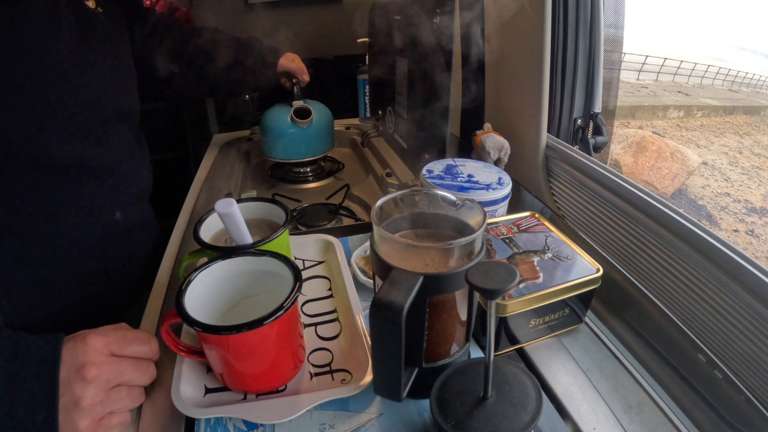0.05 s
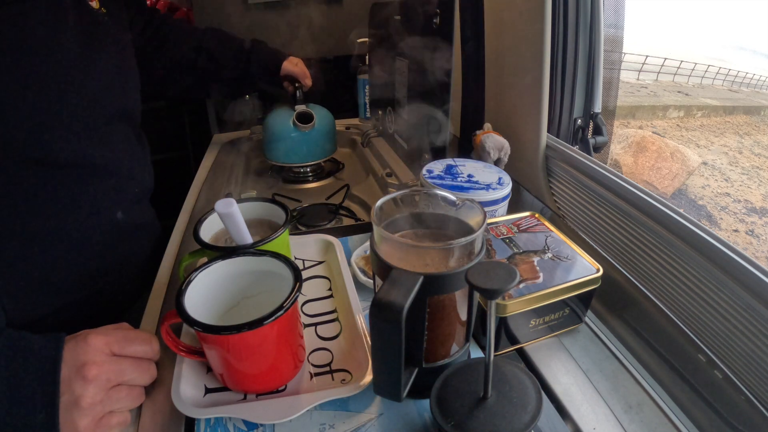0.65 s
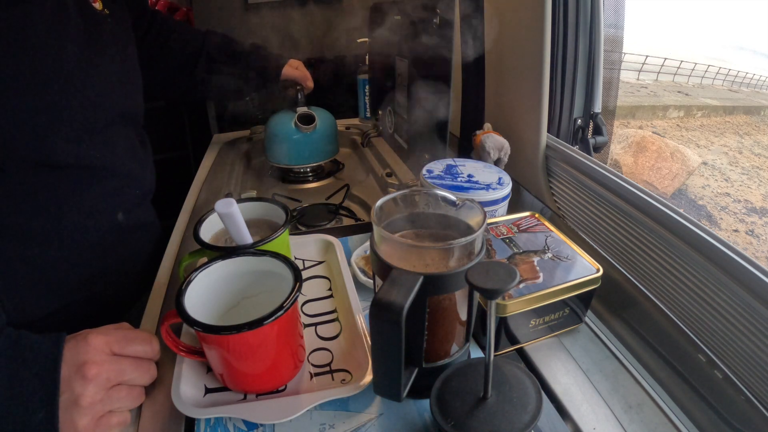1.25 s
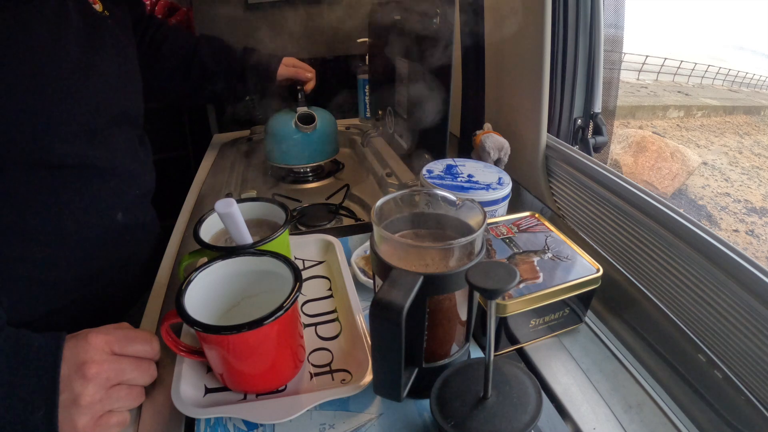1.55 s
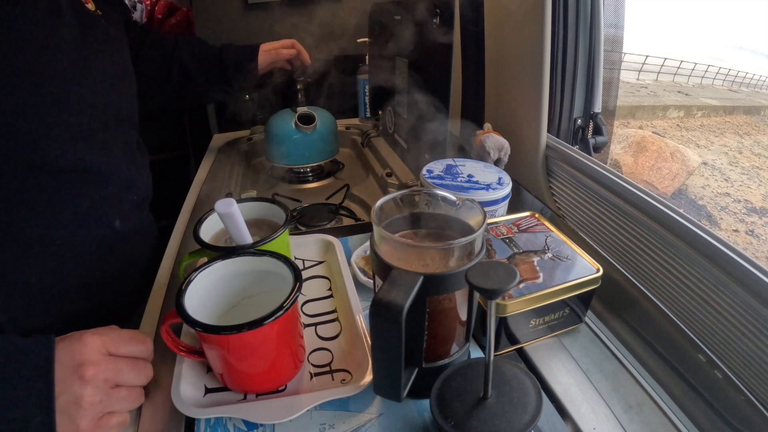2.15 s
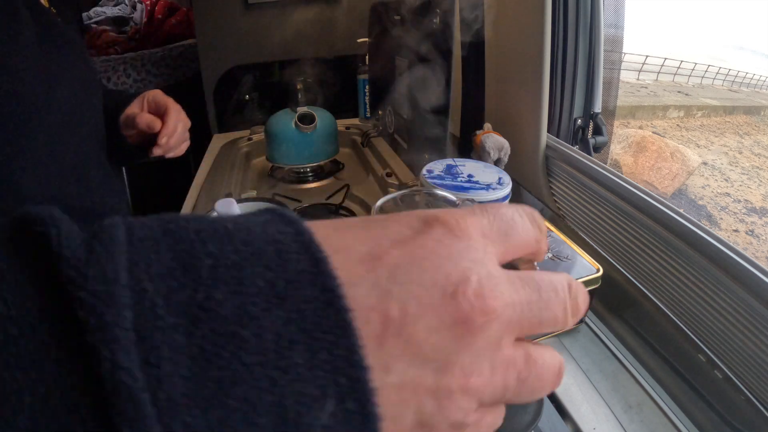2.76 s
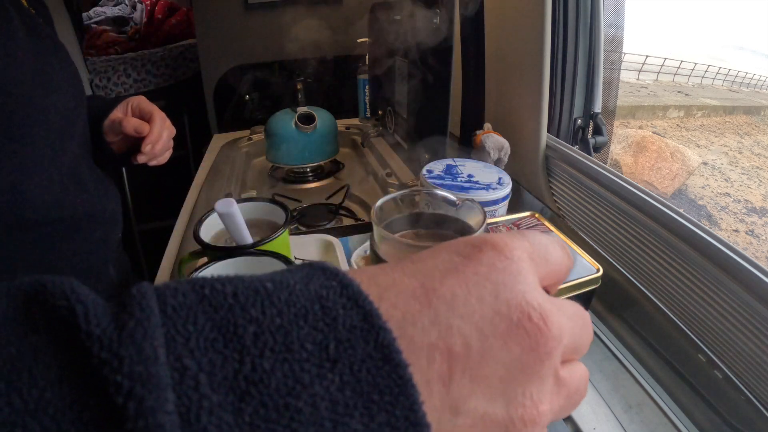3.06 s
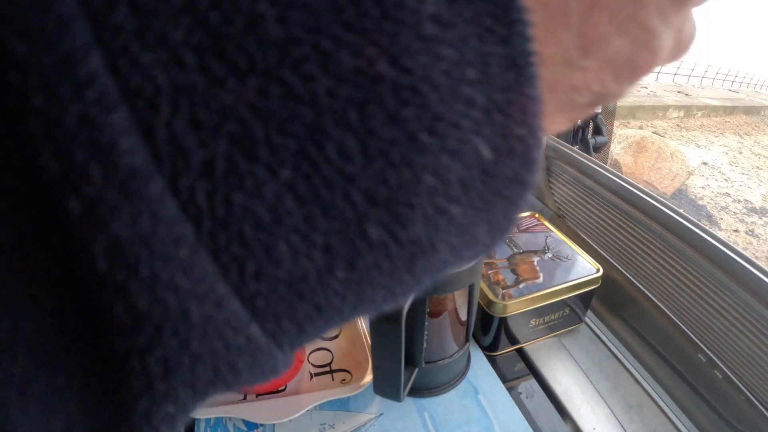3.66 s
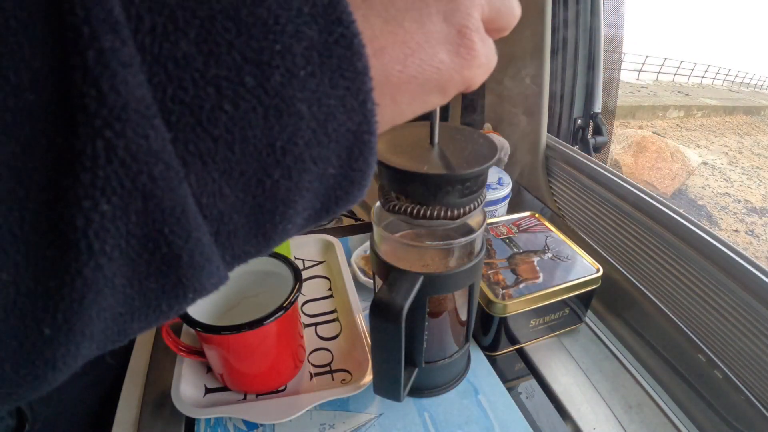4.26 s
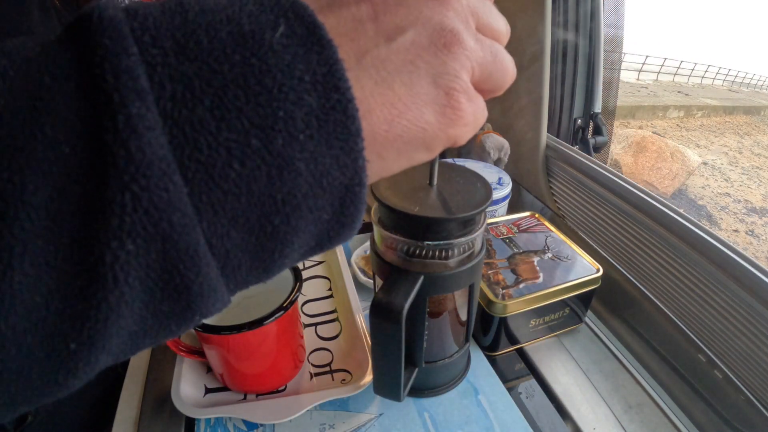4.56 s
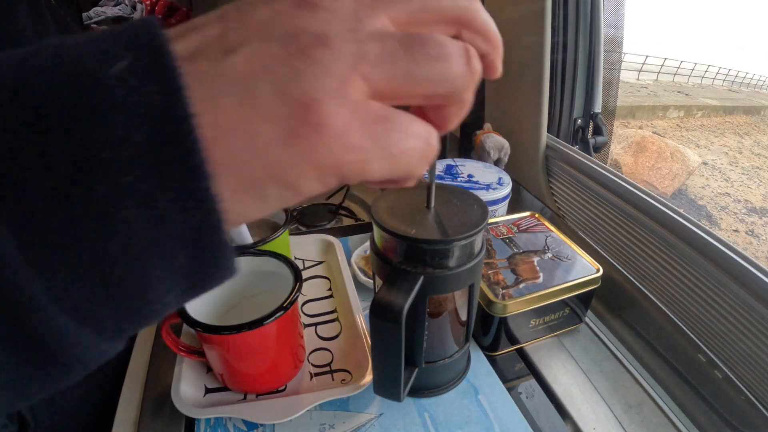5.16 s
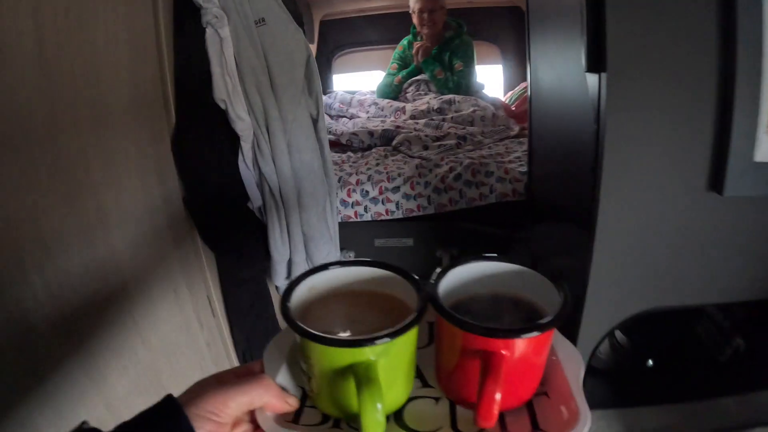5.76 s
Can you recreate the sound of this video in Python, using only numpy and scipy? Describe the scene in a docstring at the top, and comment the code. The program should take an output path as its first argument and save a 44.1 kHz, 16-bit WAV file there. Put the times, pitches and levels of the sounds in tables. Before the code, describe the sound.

In a cramped van kitchen with almost no echo, a kettle clatters and wobbles on the steel bars of a stove over the soft, constant rumble of a gas flame. Two dull knocks follow as a plunger is picked up, with faint, close swishes of a sleeve. Its filter taps a glass coffee press a few times and the lid clacks into place. The rumble then stops abruptly, giving way to near silence and a tiny rustle.

```python
"""A low, steady roar, likely a gas burner, fills a small van. A kettle is set on the hob and rocks on the
pan support, each impact exciting the modes of kettle, steel bars, hob and counter. A fleece sleeve
brushes close by with a hiss of friction; the plunger lid taps a glass coffee press and clicks home.
Near the end the roar stops abruptly, leaving a quieter cabin and a soft rustle."""
import sys
import numpy as np
from scipy import signal
from scipy.fft import rfft, irfft
from scipy.io import wavfile
from scipy.ndimage import uniform_filter1d

SR = 44100
rng = np.random.default_rng(int(sys.argv[2]) if len(sys.argv) > 2 else 0)


def digitize_waveform(pressure):
    """Quantize a signal to 16-bit integers and store it at the path in sys.argv[1].

    Rows of a 2-D input are taken as channels; values are limited to [-1, 1].
    """
    field = np.atleast_2d(pressure).T
    bounded = np.clip(field, -1, 1)
    quanta = np.round(bounded * 32767).astype(np.int16)
    wavfile.write(sys.argv[1], SR, quanta)


N = 260631


def gain_of(db):
    """Amplitude ratio: tenfold for every 20 dB."""
    return 10 ** (np.asarray(db) / 20)


def curve_at(points, hz):
    """Interpolation on a logarithmic frequency axis."""
    f, value = np.transpose(points)
    return np.interp(np.log(hz + 1), np.log(f + 1), value)


# Stereo width. Each row: frequency in Hz, side level over mid in dB.
STEREO_WIDTH = [(30, -20), (120, -17), (500, -9.5), (2000, -11), (8000, -15), (12000, -4.5)]

def noise(spectrum, size):
    """Spectral shaping: stereo noise of rms 1, nearly coherent between the ears in the bass."""
    hz = np.fft.rfftfreq(size, 1 / SR)
    roll_off = np.maximum(hz / spectrum[-1][0], 1) ** -4
    white = rfft(rng.standard_normal((2, size)))
    mid, side = white * gain_of(curve_at(spectrum, hz)) * roll_off * (hz > 10)
    side = side * gain_of(curve_at(STEREO_WIDTH, hz))
    x = irfft(np.array([mid + side, mid - side]), size)
    return x / x.std()


def unit_blow(x):
    """Normalisation of an impact to rms 1 over its first 30 ms."""
    return x / np.sqrt(np.mean(x[:, :round(.03 * SR)] ** 2))


def ring(modes, rise_s, scatter_db, spread, detune=0.0044):
    """Free vibration: a sum of damped modes, weighted and loaded anew by each point of contact."""
    t = np.arange(SR // 2) / SR
    hz, db, t60 = np.transpose(modes)[:, :, None]
    weight, lag, phase, load = rng.standard_normal((4, len(modes), 1))
    envelope = gain_of(db + scatter_db * weight - 60 * t / t60) * (1 - np.exp(-t / rise_s))
    angle = 2 * np.pi * hz * (1 + detune * load) * t + np.pi * phase
    ear_phase = spread * lag * np.sqrt(hz / hz.max())
    return unit_blow(np.array([(envelope * np.sin(angle + ear * ear_phase)).sum(0) for ear in (1, -1)]))


def burst(spectrum, decay, rise_s):
    """Modal overlap: dense modes merge into noise, each band dying at its own rate."""
    size = SR // 2
    t, hz = np.arange(size) / SR, np.fft.rfftfreq(size, 1 / SR)
    excitation = rfft(noise(spectrum, size))
    centres, t60s = np.transpose(decay)
    bands = [irfft(excitation * curve_at(np.c_[centres, share], hz), size) for share in np.eye(len(decay))]
    dying = sum(band * gain_of(-60 * t / t60) for band, t60 in zip(bands, t60s))
    return unit_blow(dying * (1 - np.exp(-t / rise_s)))


def soften(x, corner_hz):
    """A soft contact acts as a low-pass filter."""
    return signal.sosfilt(signal.butter(2, min(corner_hz, .45 * SR), fs=SR, output="sos"), x)


def add(mix, start_s, sound):
    """Superposition of a stereo sound on the mix."""
    part = mix[:, round(start_s * SR):][:, :sound.shape[1]]
    part += sound[:, :part.shape[1]]


def quiet_share(at_s=5.633, fade_s=0.0038):
    """Linear crossfade from 0 to 1 as the roar gives way to the quiet cabin."""
    return np.clip((np.arange(N) / SR - at_s) / fade_s + .5, 0, 1)


# Spectra of the still cabin and a rustle. Each row: frequency in Hz, relative density in dB.
CABIN_SPECTRUM = [(20, 2), (45, -3.5), (100, -15), (200, -19.5), (370, -29.5), (520, -38), (800, -42),
                  (1500, -32.5), (3000, -40), (7000, -44.5), (10000, -58.5), (14000, -66)]
RUSTLE_SPECTRUM = [(200, 0), (800, -8), (1500, -6), (3200, -4), (5000, -18), (9000, -31), (13000, -50)]
# Envelope of the rustle. Each row: time in seconds, level in dB.
RUSTLE_ENVELOPE = [(5.78, -70), (5.86, -68.5), (5.885, -55), (5.91, -59)]

def quiet_cabin():
    """Ambient noise: a bass-heavy floor with one brief broadband rustle."""
    ambience = quiet_share() * gain_of(-52) * noise(CABIN_SPECTRUM, N)
    times, levels = np.transpose(RUSTLE_ENVELOPE)
    rustle_db = np.interp(np.arange(N) / SR, times, levels, left=-np.inf, right=-np.inf)
    return ambience + gain_of(rustle_db) * noise(RUSTLE_SPECTRUM, N)


# Spectra of the rumble, midrange roar and gas jet. Each row: frequency in Hz, relative density in dB.
RUMBLE_SPECTRUM = [(20, 1.5), (35, 3), (50, -1), (90, -2.5), (165, -3.5), (250, -17), (330, -18.5),
                   (480, -37), (900, -54.5)]
ROAR_SPECTRUM = [(250, -12.5), (400, -0.5), (500, -7.5), (620, -0.5), (800, -13), (1040, -0.5), (1350, -7),
                 (1700, -7), (2100, -15.5), (2700, -21), (5000, -50)]
JET_SPECTRUM = [(1500, -14), (2600, -2), (7500, 4.5), (10000, -5), (13000, -14.5)]
# Faint tones in the roar. Each row: centre in Hz, bandwidth in Hz, level in dB.
WHISTLE_BANDS = [(990, 180, -70.5), (4780, 300, -85)]

def burner(waver_s=.11, waver_db=1.5):
    """Broadband noise with a randomly modulated rumble; narrow bands of it are heard as whistles."""
    waver = np.interp(np.arange(N) / SR / waver_s, np.arange(N), rng.standard_normal(N))
    rumble = gain_of(-41 + waver_db * waver) * noise(RUMBLE_SPECTRUM, N)
    roar = rumble + gain_of(-58) * noise(ROAR_SPECTRUM, N) + gain_of(-77) * noise(JET_SPECTRUM, N)
    for hz, width, db in WHISTLE_BANDS:
        band = signal.butter(2, [hz - width / 2, hz + width / 2], "bandpass", fs=SR, output="sos")
        whistle = signal.sosfilt(band, rng.standard_normal(N))
        roar += gain_of(db) * whistle / whistle.std()
    return roar * (1 - quiet_share())


# Spectrum of rubbing fleece. Each row: frequency in Hz, relative density in dB.
FLEECE_SPECTRUM = [(800, -27), (2500, -7), (3800, -6), (5200, -3), (7500, -0.5), (9000, -4.5),
                   (10500, -15.5), (12200, -11.5), (14500, -31)]
# Strokes of the arm. Each row: start in seconds, length in seconds, peak level in dB.
SLEEVE_STROKES = [(2.29, 0.31, -71.5), (2.567, 0.46, -65.5), (3.205, 0.41, -68.5), (3.325, 0.3, -61),
                  (3.56, 0.23, -66), (3.72, 0.21, -71.5), (4.095, .11, -64.5), (4.158, 0.28, -69.5),
                  (4.482, 0.14, -61), (4.684, 0.26, -72.5), (5.058, 0.083, -73), (5.167, 0.92, -67)]

def sleeve(skew=0.69, speed_exponent=0.81):
    """Friction noise: fleece fibres catch and hiss, louder the faster the sleeve slides."""
    t, power = np.arange(N) / SR, np.zeros(N)
    for start, length, db in SLEEVE_STROKES:
        progress = np.clip((t - start) / length, 0, 1)
        speed = abs(np.sin(np.pi * progress ** skew))  # one arch, peaking before its middle
        power += (gain_of(db) * speed ** speed_exponent) ** 2
    catch = uniform_filter1d(rng.standard_normal(N), size=300)
    flicker = gain_of(catch / catch.std())  # about one decibel
    return noise(FLEECE_SPECTRUM, N) * flicker * np.sqrt(power) * (1 - quiet_share())


# Modes of the plastic lid, glass beaker and steel filter disc.
# Each row: frequency in Hz, relative level in dB, T60 in seconds.
LID_MODES = [(663, -5.5, 0.075), (788, -0.5, 0.039), (1317, -4, .06), (1877, 3, 0.024), (2229, -6, 0.066),
             (3294, -4.5, 0.026), (4220, -6.5, 0.043), (5560, -6, 0.023), (7500, -13.5, .03)]
GLASS_MODES = [(1300, 0, 0.049), (3050, -7, 0.027)]
DISC_MODES = [(4440, -0.5, 0.036), (4340, -7.5, 0.066)]
# Spectrum of the lid's crack. Each row: frequency in Hz, relative density in dB.
CRACK_SPECTRUM = [(200, -27), (700, -0.5), (2000, 0), (4300, -3.5), (6000, -5.5), (8200, -8),
                  (10000, -13.5), (13000, -27), (16000, -52)]
# Reverberation of the cabin. Each row: frequency in Hz, T60 in seconds.
CABIN_REVERB = [(200, 0.23), (1000, 0.14), (4000, 0.13), (12000, 0.1)]

def press_responses():
    """Impulse responses to one contact on the press; crack and glass carry a faint reverberant tail."""
    crack = burst(CRACK_SPECTRUM, decay=[(500, 0.061), (3000, 0.023), (10000, 0.019)], rise_s=0.00038)
    tail = burst(CRACK_SPECTRUM, CABIN_REVERB, rise_s=0.02)
    lid, glass, disc = (ring(modes, rise_s=.0002, scatter_db=.5, spread=.15)
                        for modes in (LID_MODES, GLASS_MODES, DISC_MODES))
    thud = burst(spectrum=[(30, -2), (90, -1), (240, 7.5), (450, -11.5), (1200, -50)],
                 decay=[(100, 0.31), (400, 0.13)], rise_s=0.003)
    return crack + gain_of(-18) * tail, lid, glass + gain_of(-12.5) * tail, disc, thud


# The filter meets the beaker. Each row: start in seconds, then ring, crack and counter thud in dB.
FILTER_CLINKS = [(4.366, -65.5, -72, -75), (4.4645, -77, -64.5, -65.5), (4.4965, -41.5, -49, -55),
                 (4.557, -57, -44, -42.5), (4.566, -42.5, -60, -41)]
# The plunger is picked up; later its lid snaps home.
# Each row: start in seconds, strength in dB, low-pass corner in Hz, counter thud in dB.
LID_CLACKS = [(2.854, -62, 2600, -37.5), (2.932, -51.5, 1520, -44), (4.822, -65.5, 5030, -67.5),
              (4.832, -55, 6100, -69), (4.8431, -25.5, 8860, -44.5), (4.859, -34.5, 1500, -49),
              (4.878, -30.5, 1050, -41.5), (5.282, -73, 7000, -70)]

def coffee_press():
    """Impacts on well-damped bodies: the filter clinks on the glass and the plastic lid clacks."""
    out = np.zeros((2, N))
    for start, ring_db, crack_db, thud_db in FILTER_CLINKS:
        crack, _, glass, disc, thud = press_responses()
        add(out, start, gain_of(ring_db) * (glass + gain_of(-6) * disc))
        add(out, start, gain_of(crack_db) * soften(crack, corner_hz=11400) + gain_of(thud_db) * thud)
    for start, db, corner_hz, thud_db in LID_CLACKS:
        crack, lid, glass, disc, thud = press_responses()
        clack = soften(crack + gain_of(1) * lid + gain_of(-19) * disc, corner_hz)
        add(out, start, gain_of(db) * (clack + gain_of(-19.5) * glass) + gain_of(thud_db) * thud)
    return out


# Modes of the kettle, pan support, hob and counter, and the cabin's lowest standing wave.
# Each row: frequency in Hz, relative level in dB, T60 in seconds.
KETTLE_MODES = [(476.6, -16, 0.49), (1008.3, 2, 0.16), (1092, -2, 0.09), (1143, -1, 0.082),
                (1357, -7, 0.15), (1845, -11.5, 0.23), (2124, -20.5, 0.17), (4526, -26.5, 0.13)]
BAR_MODES = [(3050, -5, .11), (3780, -14, 0.1), (4110, -2, .07), (4640, -3, 0.059), (5010, -18, 0.098),
             (5520, -15.5, .1), (5900, -6.5, 0.08), (6350, -12.5, 0.15), (6880, -5, 0.081),
             (7790, -6.5, .09), (8400, -8.5, 0.049)]
HOB_MODES = [(330, -19.5, .4), (438, -7, 0.25), (474, -15, 0.23), (590, -4, 0.24), (739, -13, 0.37),
             (797, -1, 0.16), (835.6, 5.5, 0.15), (943, -3, 0.2), (1153, -4, 0.19), (1292, 1, 0.14),
             (1363, 0.5, 0.16), (1430, -2.5, 0.2), (1625, -9.5, 0.25), (1950, 4, 0.11), (2030, -5, 0.13),
             (2420, -9, 0.15), (3290, -17, 0.24)]
COUNTER_MODES = [(166.6, -9, 0.25), (203.2, -0.5, 0.22), (224.4, -7, .2), (255.4, -10, 0.18)]
AIR_MODE = [(75.2, 0, 0.32)]
# Spectra of rattling sheet metal and clashing bars. Each row: frequency in Hz, relative density in dB.
RATTLE_SPECTRUM = [(100, -23.5), (250, 3), (600, 1), (900, -5), (1350, 6), (1600, -4), (2050, -0.5),
                   (2800, -22), (4500, -35.5), (9000, -60)]
CLASH_SPECTRUM = [(800, -22), (2300, 8), (3500, -1.5), (4600, 0), (6000, -7), (8200, -4), (9800, -14),
                  (12500, -17.5), (15000, -36)]
# Damping of that steel. Each row: frequency in Hz, T60 in seconds.
STEEL_DECAY = [(200, 0.55), (800, 0.29), (2000, 0.14), (5000, 0.15), (12000, 0.092)]
# As the hob takes the weight, the kettle's ring gives way to the hob's. Each row: time in seconds,
# kettle ring and hob ring in dB relative to the knock, cabin boom in dB relative to the thump.
WEIGHT_TRANSFER = [(.87, 6, -18, -13), (1.22, -9, -1, -5), (1.6, -7.5, 3, -10)]
# The kettle rocks. Each row: start in seconds, strength in dB, counter thump in dB,
# hardness in dB (0 is bare steel on steel).
KETTLE_KNOCKS = [(0.8564, -27, -19.5, -13), (.884, -32, -24.5, -18.5), (1.041, -34, -30.5, -19.5),
                 (1.1549, -34, -24.5, -23.5), (1.179, -33, -43, -20), (1.225, -55.5, -30.5, -1),
                 (1.250, -31, -28.5, -8.5), (1.409, -34.5, -31, -8), (1.472, -55, -35.5, 1.5),
                 (1.508, -35, -34, -4), (1.5418, -26, -20, -2.5), (1.6015, -27, -23, -2),
                 (1.646, -31.5, -27.5, -5.5), (1.681, -37, -30.5, -2.5), (1.705, -41.5, -37, -2)]

def kettle(hard_rise_s=0.00096):
    """Impact excitation: each knock rings kettle, bars and hob; counter and cabin respond more slowly."""
    out, t = np.zeros((2, N)), np.arange(SR // 2) / SR
    early_boost = 1 + 0.46 * np.exp(-(t / 0.023) ** 4)  # near walls reinforce the first milliseconds
    steel = burst(CLASH_SPECTRUM, STEEL_DECAY, rise_s=.0002)  # the same bars answer every knock
    times, *seating_curves = np.transpose(WEIGHT_TRANSFER)
    for start, db, thump_db, hard_db in KETTLE_KNOCKS:
        kettle_db, hob_db, air_db = (np.interp(start, times, curve) for curve in seating_curves)
        bars = ring(BAR_MODES, rise_s=.0002, scatter_db=4, spread=0.16, detune=.008)
        clash = steel + 0.52 * burst(CLASH_SPECTRUM, STEEL_DECAY, rise_s=.0002) + 0.5 * bars
        corner_hz = 11500 * gain_of(0.06 * (db + hard_db + 30))  # harder blows are brighter
        layers = [(hard_db, soften(clash, corner_hz)),
                  (hob_db, ring(HOB_MODES, rise_s=0.0018, scatter_db=3, spread=0.14)),
                  (0, burst(RATTLE_SPECTRUM, STEEL_DECAY, rise_s=0.0014)),
                  (kettle_db, ring(KETTLE_MODES, rise_s=0.00059, scatter_db=5.5, spread=.15))]
        rise_s = hard_rise_s * gain_of(-0.72 * hard_db)  # softer contacts build up more slowly
        contact = early_boost * (1 - np.exp(-t / rise_s))
        metal = sum(gain_of(db + part_db) * unit_blow(contact * part) for part_db, part in layers)
        thump = ring(COUNTER_MODES, rise_s=0.0047, scatter_db=3, spread=0.03)
        boom = ring(AIR_MODE, rise_s=.006, scatter_db=0, spread=0.033)
        add(out, start, metal + gain_of(thump_db) * (thump + gain_of(air_db) * boom))
    return out


def scene():
    """Linear superposition of all the sources."""
    return kettle() + coffee_press() + sleeve() + burner() + quiet_cabin()


def record(dry):
    """Interaural delay and band limit: the left channel lags slightly and the top treble is removed."""
    delay_s, max_lag_rad, cutoff_hz = 4.5e-5, .65, 14500
    lag = np.minimum(2 * np.pi * np.fft.rfftfreq(N, 1 / SR) * delay_s, max_lag_rad)
    ears = irfft(rfft(dry) * np.exp(.5j * np.array([-lag, lag])), N)
    low_pass = signal.firwin(255, cutoff_hz, window=("kaiser", 8), fs=SR)
    return signal.oaconvolve(ears, low_pass[None], "same")


dry = scene()
out = record(dry)
digitize_waveform(out)
```